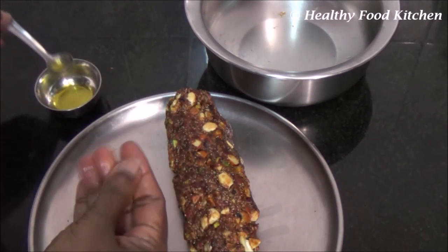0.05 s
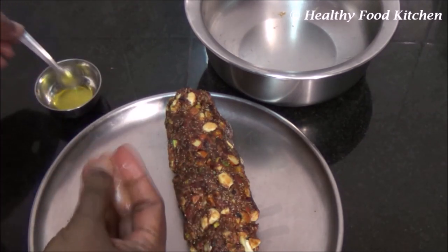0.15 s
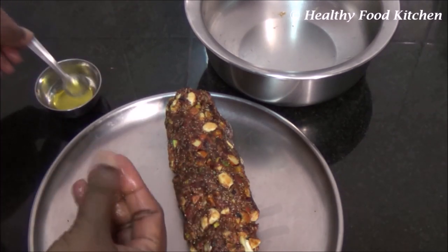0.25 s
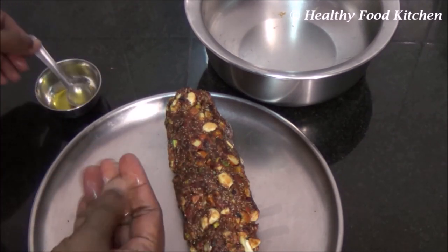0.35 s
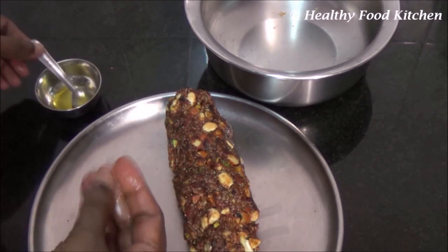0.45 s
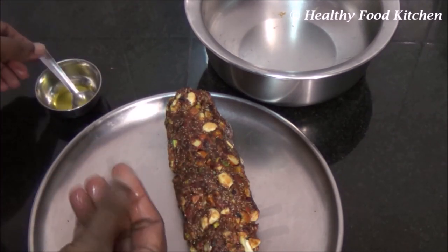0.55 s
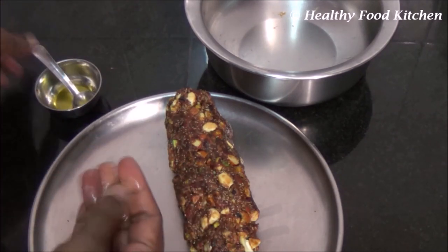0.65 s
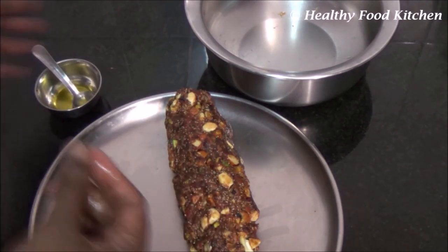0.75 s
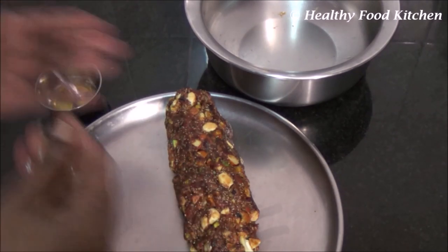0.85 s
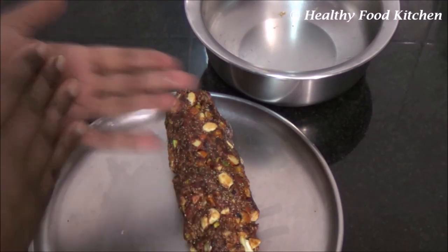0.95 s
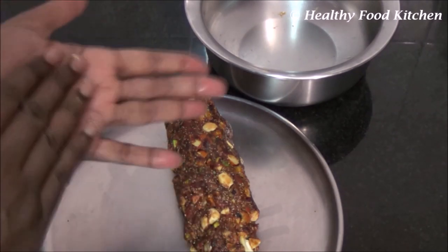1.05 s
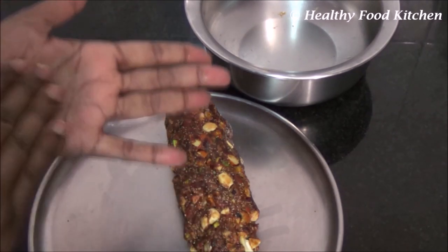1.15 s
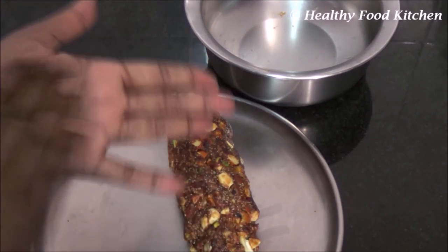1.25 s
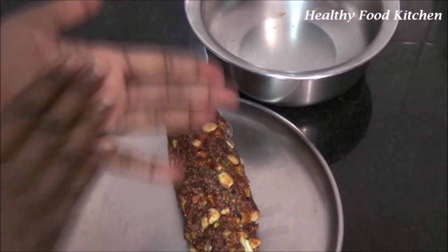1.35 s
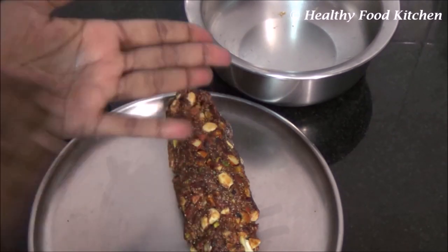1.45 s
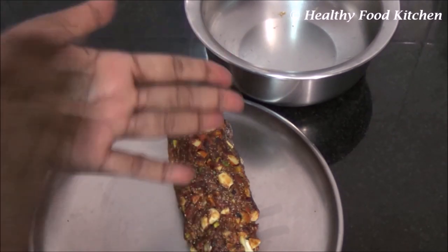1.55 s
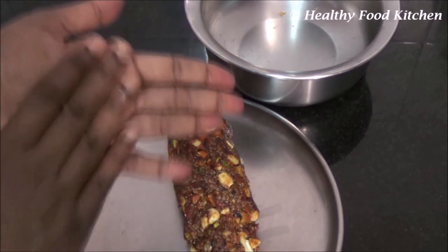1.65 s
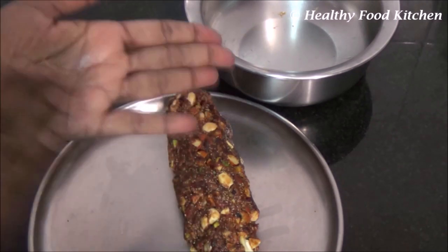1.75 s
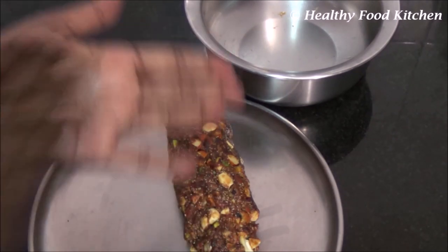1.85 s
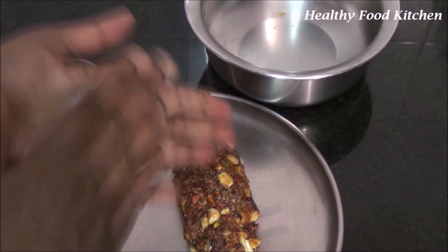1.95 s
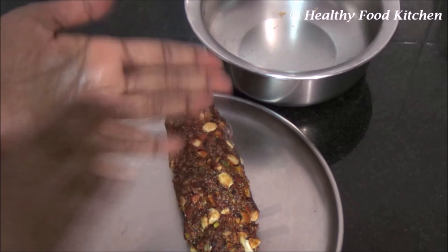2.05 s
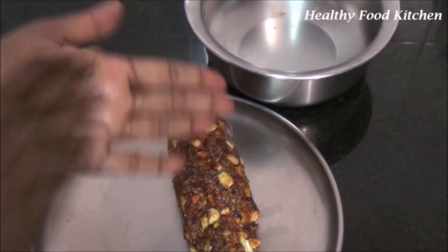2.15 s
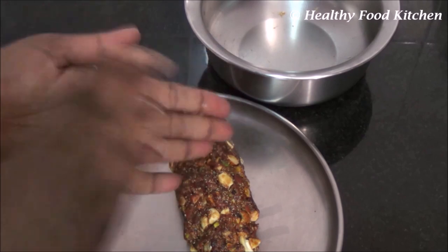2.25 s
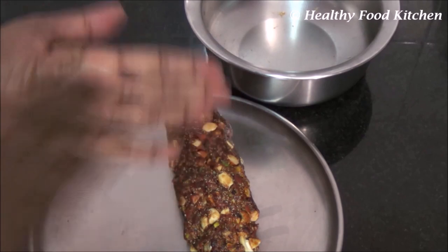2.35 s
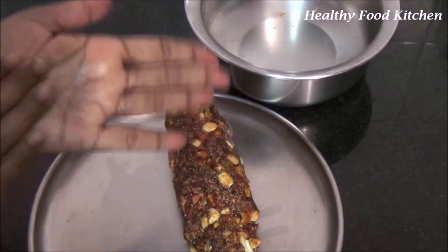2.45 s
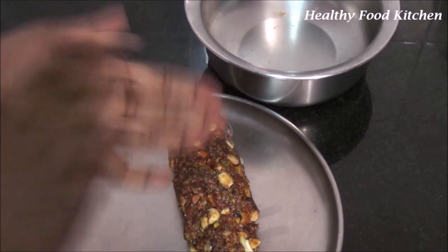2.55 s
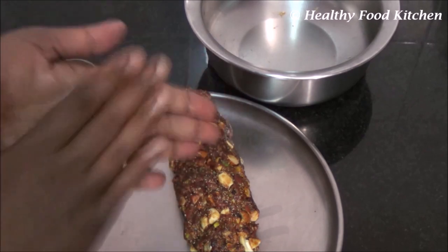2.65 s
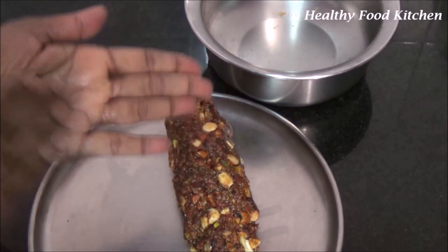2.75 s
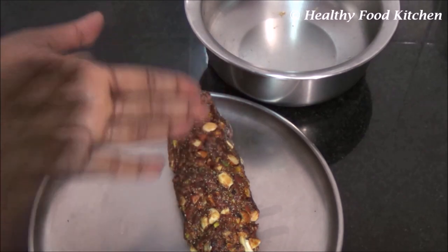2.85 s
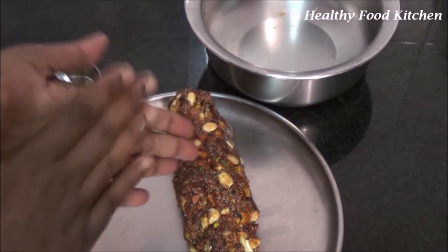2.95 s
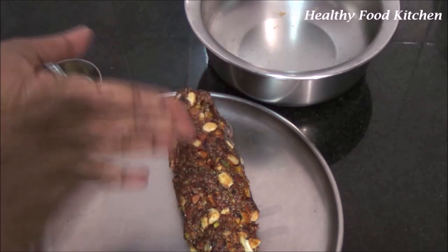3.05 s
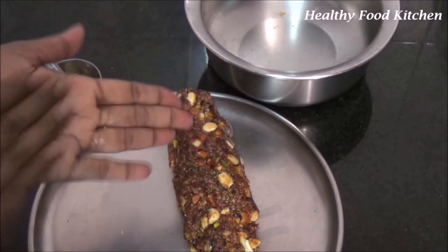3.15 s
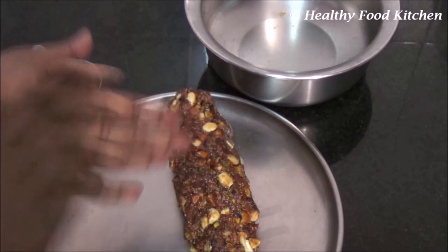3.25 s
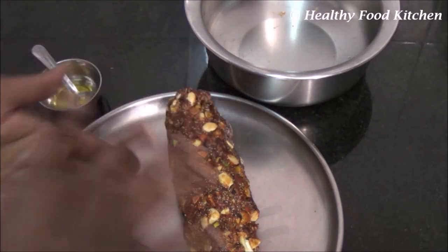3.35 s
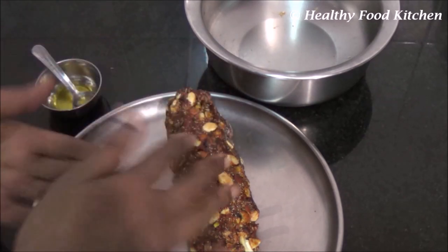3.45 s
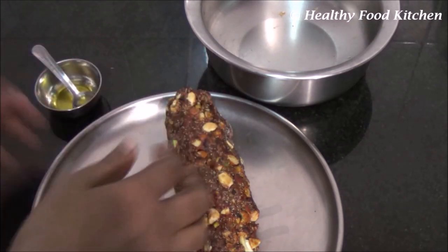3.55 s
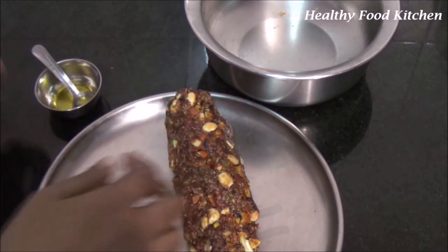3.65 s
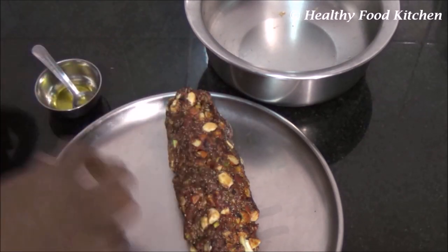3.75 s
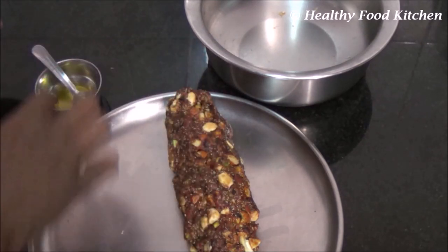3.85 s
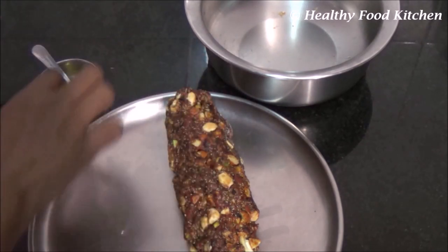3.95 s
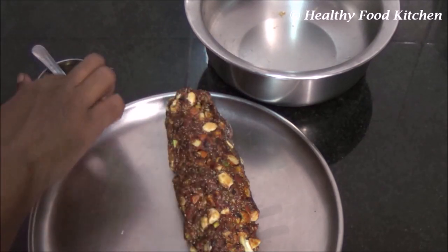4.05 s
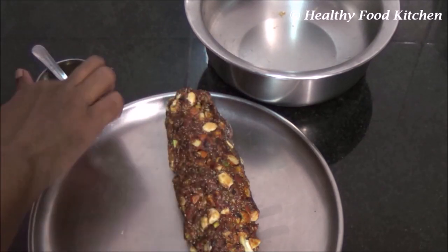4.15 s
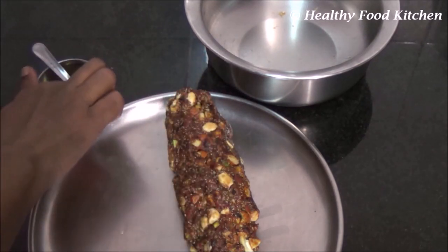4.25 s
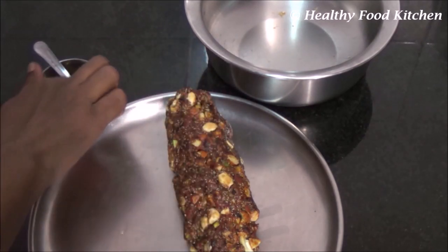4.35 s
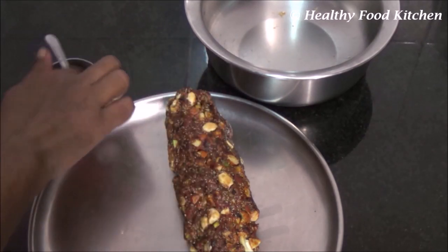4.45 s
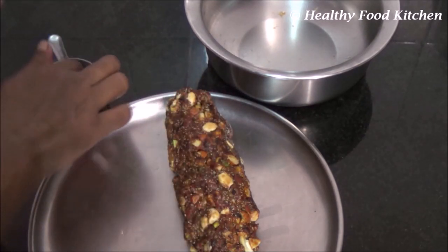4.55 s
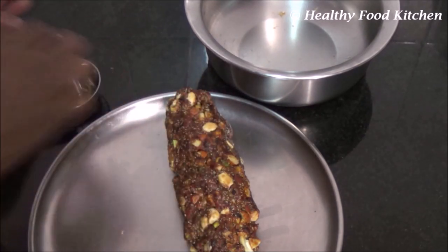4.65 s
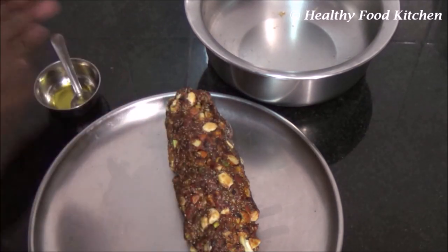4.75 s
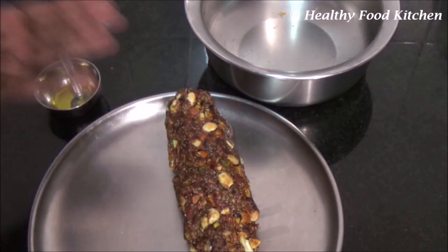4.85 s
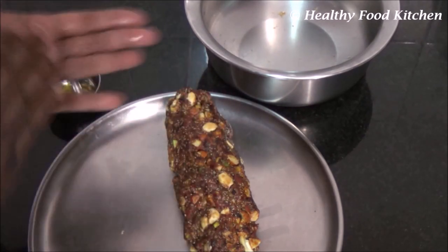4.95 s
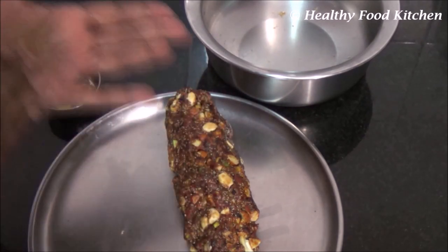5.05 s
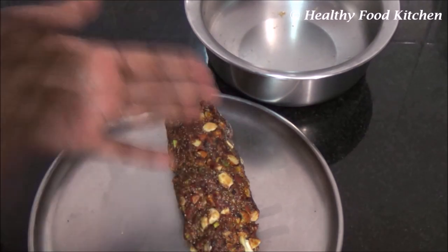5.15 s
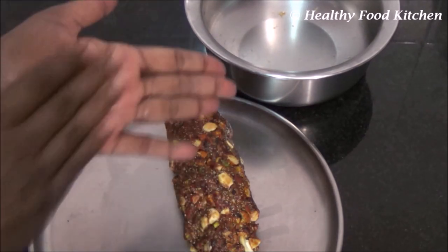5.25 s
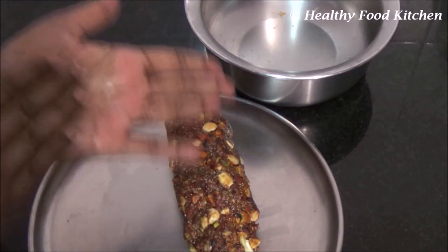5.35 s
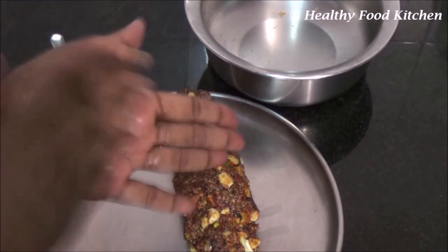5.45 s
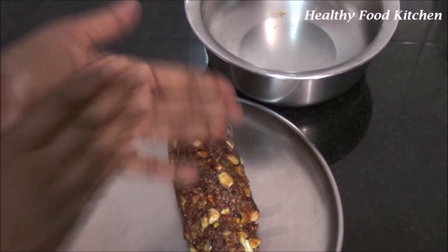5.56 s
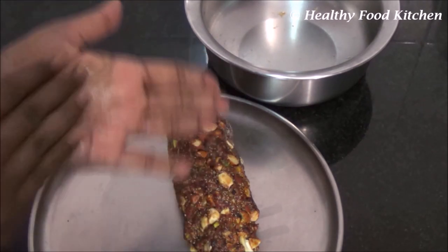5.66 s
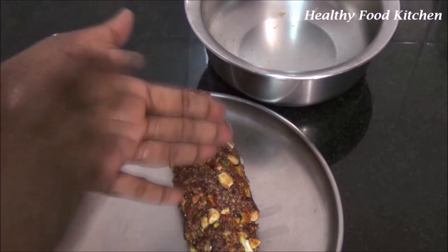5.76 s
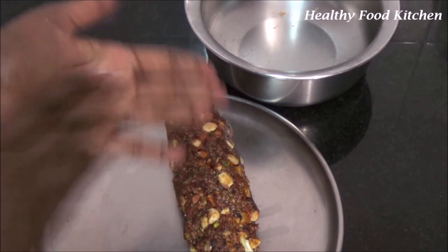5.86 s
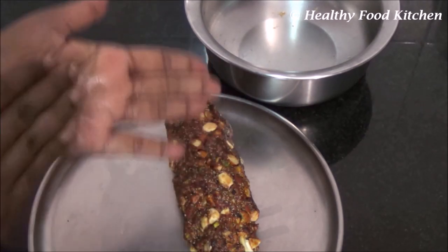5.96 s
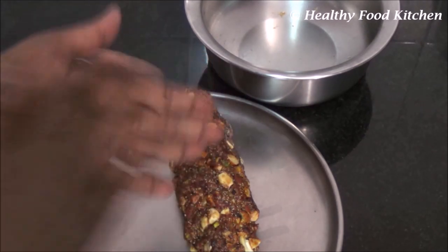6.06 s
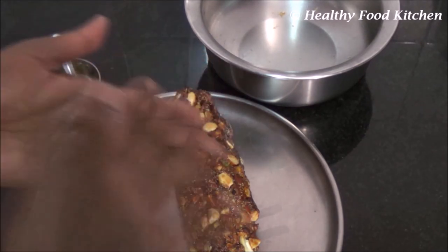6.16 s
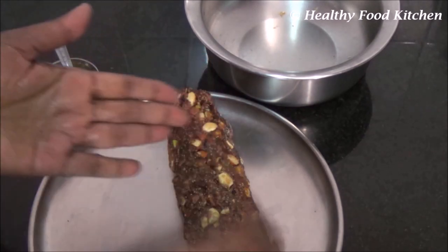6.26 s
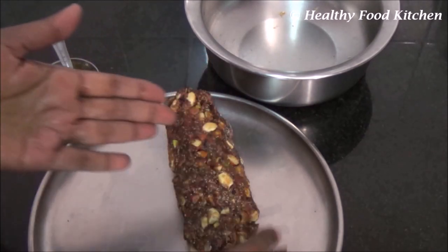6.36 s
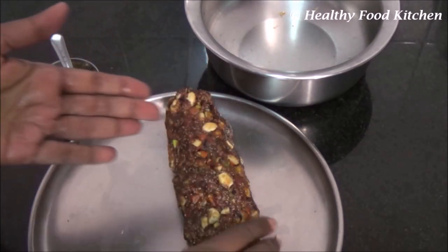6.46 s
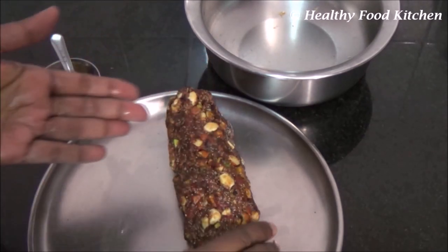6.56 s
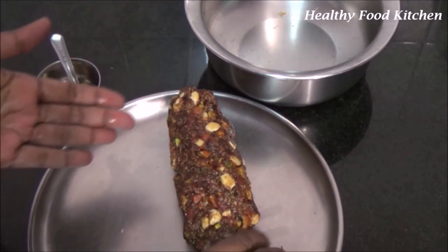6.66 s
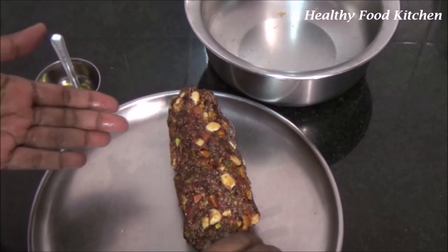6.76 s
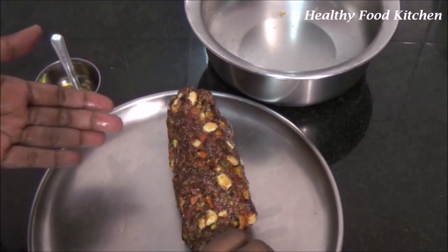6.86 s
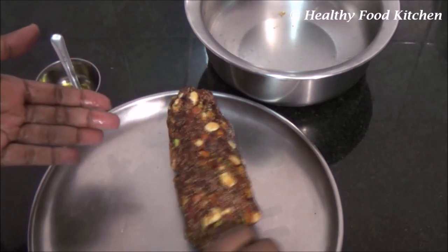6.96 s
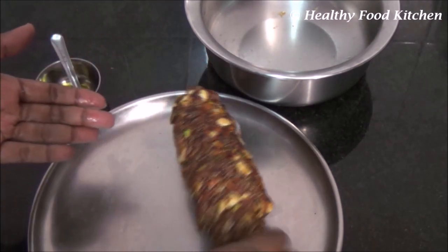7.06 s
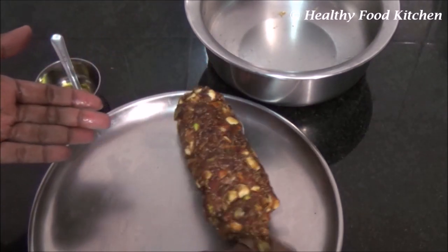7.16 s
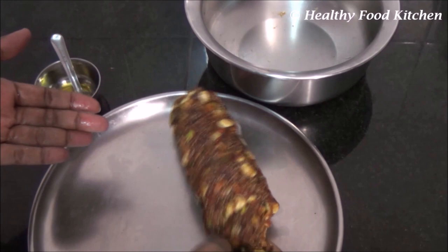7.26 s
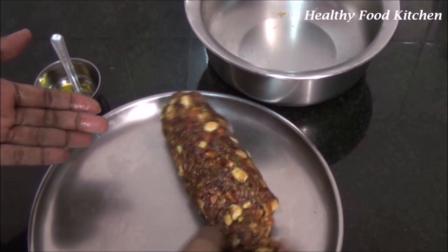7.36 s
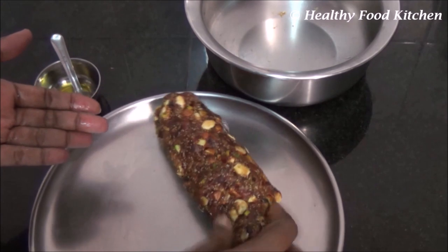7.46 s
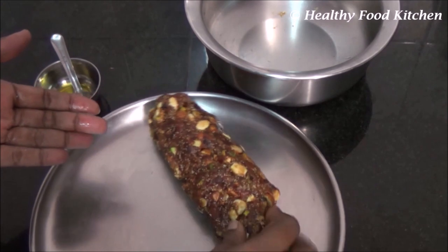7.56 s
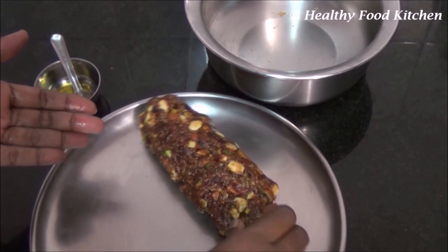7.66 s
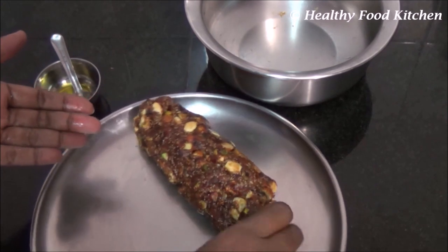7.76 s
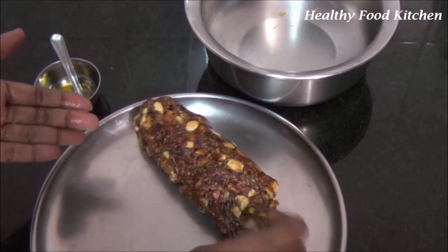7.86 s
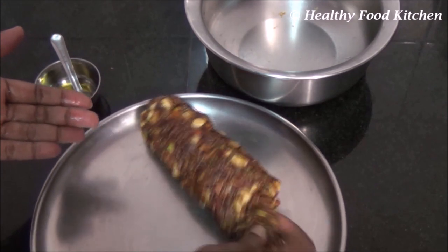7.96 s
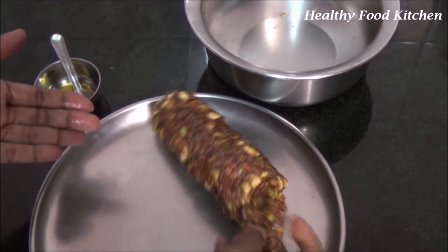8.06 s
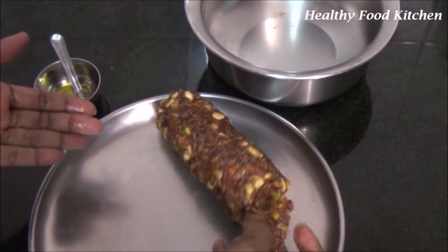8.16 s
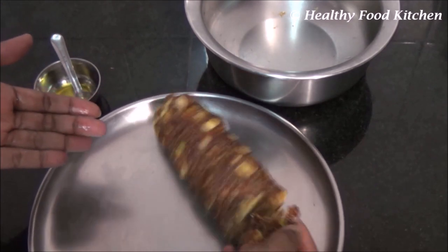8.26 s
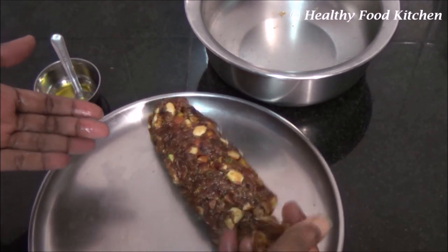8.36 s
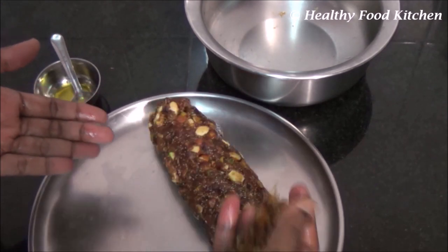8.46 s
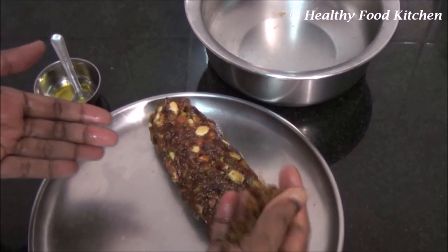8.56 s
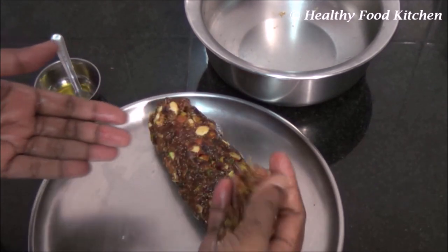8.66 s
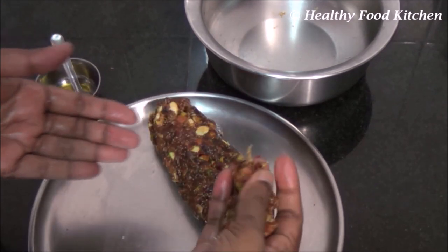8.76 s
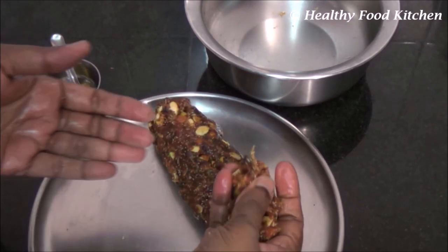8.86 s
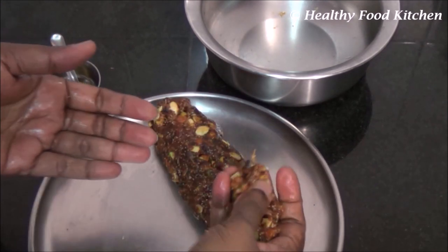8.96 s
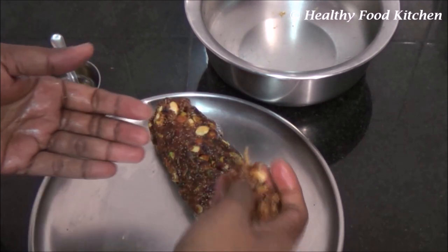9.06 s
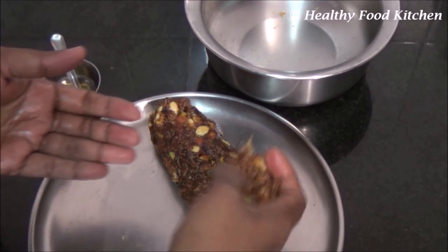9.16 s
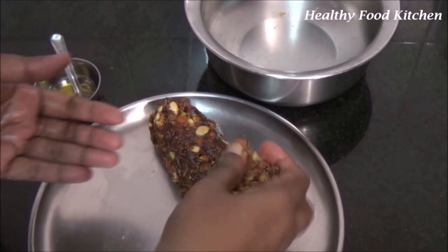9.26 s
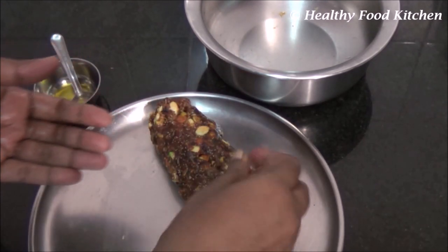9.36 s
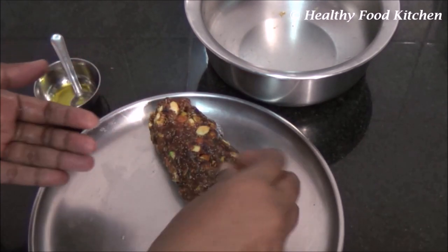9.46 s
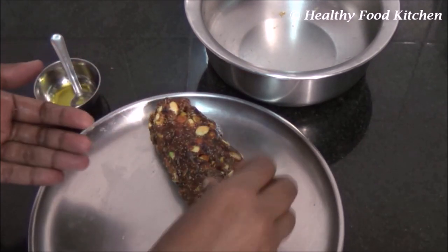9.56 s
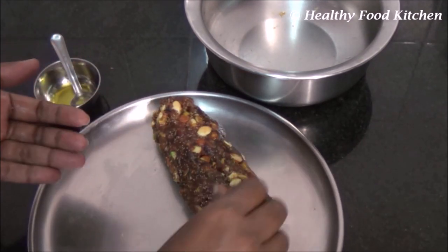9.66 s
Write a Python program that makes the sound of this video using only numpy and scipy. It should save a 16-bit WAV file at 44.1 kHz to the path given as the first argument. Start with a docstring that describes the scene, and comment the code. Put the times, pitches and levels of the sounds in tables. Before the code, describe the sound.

A quiet kitchen heard close up, with a steady low fridge hum, a faint thin whine and soft room air throughout, lasting nearly ten seconds. At about 0.8 s a spoon drops into a small steel bowl: a loud, bright, short clink with a brief rattle and room echo. From 1.2 to 3.5 s oily palms rub to and fro in quick airy swishes with a hollow, rising tint, strongest around 2.5 to 2.9 s. A tiny sticky tick or two follows, then near 4.4 s a barely audible scrape and at 4.6 to 4.7 s light spoon clinks. Softer rubbing runs from 5.1 to 6.4 s. From 6.7 s sticky peeling crackles and gritty drags begin, with a small cluster of knocks at 7.05 s, a hard plate knock at 8.1 s and a duller one at 8.5 s. Faint peels and snaps fade out to the end.

```python
"""A quiet kitchen: a spoon drops against a small steel bowl, oily palms rub to and fro,
then fingers pull lumps off a sticky nut log lying on a steel plate, while a fridge motor hums.
Steel sounds are noise bursts ringing through resonances; rubbing, peeling and scraping are gritty noise
that swells with each movement; the fridge is wavering tones and narrow noise.
Sparse random echoes add the room, and steady coloured noise its air."""
import sys
import numpy as np
from scipy import signal
from scipy.fft import rfft, irfft
from scipy.io import wavfile
from scipy.ndimage import uniform_filter1d

SR = 44100
rng = np.random.default_rng(int(sys.argv[2]) if len(sys.argv) > 2 else 0)


def pcm_store(signal):
    """Save signal as 16-bit PCM."""
    levels = np.round(np.clip(np.atleast_2d(signal), -1, 1) * 32767)
    wavfile.write(sys.argv[1], SR, levels.astype(np.int16).T)


def rack_gain(trim_db):
    """Turn a fader trim in dB into the linear factor to multiply a signal by."""
    fader = np.asarray(trim_db, float)
    return 10 ** (fader / 20)


N = 428211  # length in samples

ENDS_DB = -14  # level at the start and end of a movement, against its top
ROUNDED = 1.31  # above 1 the top of a movement is rounded and its ends fall faster


def evened(x):
    """Scales to rms 1."""
    return x / np.sqrt(np.mean(x ** 2) + 1e-20)


def peak_one(x):
    """Scales to peak 1."""
    return x / abs(x).max()


def read(points, hz):
    """Value of a (f/Hz, value) table on a log-frequency axis."""
    f, value = np.transpose(points)
    return np.interp(np.log(hz + 1), np.log(f + 1), value)


def add(mix, s, sound):
    """Mixes a sound in at time s (seconds)."""
    part = mix[..., round(s * SR):][..., :sound.shape[-1]]
    part += sound[..., :part.shape[-1]]


def colour(x, points):
    """Filters by a (f/Hz, level/dB) spectrum."""
    gain = rack_gain(read(points, np.fft.rfftfreq(len(x), 1 / SR)))
    return irfft(rfft(x) * gain, len(x))


def resonate(x, hz, width):
    """A resonance of gain 1; a moving one is shifted down to zero, smoothed and shifted back."""
    r = np.exp(-np.pi * width / SR)
    if np.ndim(hz) == 0:
        return 2 * signal.lfilter([1 - r], [1, -r * np.exp(2j * np.pi * hz / SR)], x).real
    turn = np.exp(2j * np.pi * np.cumsum(hz) / SR)
    return 2 * (turn * signal.lfilter([1 - r], [1, -r], x / turn)).real


def steep(x, hz, width):
    """The same resonance applied twice; width (Hz) is that of each pass."""
    return resonate(resonate(x, hz, width), hz, width)


def puff(size, t60):
    """A burst of noise that starts suddenly and falls by 60 dB in t60 seconds."""
    return rng.standard_normal(size) * rack_gain(-60 * np.arange(size) / SR / t60)


def slow(top_hz, size=N):
    """A slow random wander: straight lines between random knots of rms about 1, 2 * top_hz knots a second."""
    knots = rng.standard_normal(200)
    return np.interp(np.arange(size) / SR * top_hz * 2, np.arange(200), knots)


def grit(size, spread_db, per_s):
    """Friction noise: dense tiny slips of uneven size over smooth noise."""
    sizes = rack_gain(spread_db * np.minimum(rng.exponential(1, size), 4))
    slips = sizes * (rng.random(size) < per_s / SR)
    return evened(rng.standard_normal(size) * (1 + uniform_filter1d(slips, size=24) * 24))


def progress(t, top_s, length):
    """Runs from -1 at the start of a movement through 0 at its top to 1 at its end."""
    rise_share = 0.59  # share of the length spent swelling
    rise = (t - top_s) / rise_share
    fall = (t - top_s) / (1 - rise_share)
    return np.where(t < top_s, rise, fall) / length


def swells(t, rows, rounded=ROUNDED):
    """Gain of overlapping movements, each (top t/s, length t/s, level/dB), added as powers."""
    ms = np.arange(t[0], t[-1], .001)  # one value a millisecond
    power = sum(rack_gain(2 * (db + ENDS_DB * abs(progress(ms, s, length)) ** rounded)) for s, length, db in rows)
    return np.interp(t, ms, np.sqrt(power))


def clink(db, tilt_db, pan_db, contact, favour_hz, favour_db):
    """A hard touch through the bowl's modes and a short crack, then a dying, smeared rattle."""
    # damped modes of the oily bowl, the lowest three from its foot on the counter: f/Hz, level/dB, width/Hz
    bowl_modes = [(686, -4, 60), (765, 1, 56), (910, -3, 52), (2600, 3.5, 360), (3000, 3, 430),
                  (3980, 1, 250), (5100, -2, 190), (6450, -7, 700), (7680, -5, 250), (8270, 1.5, 410),
                  (9550, 4, 270), (10800, 2, 380), (11900, 1, 380), (12400, -1, 690)]
    size = SR // 3
    drive = puff(size, contact)
    rattle = rack_gain(-29) * puff(size, 0.61)  # the spoon rattles on
    drive[0] += 1.03 * np.linalg.norm(drive)  # the first touch

    hz, level, width = np.transpose(bowl_modes[3:])
    level = level + tilt_db * np.log2(hz / 6000)
    # the spot that is struck lifts the modes near its favoured pitch
    favour_octaves = 0.11
    lift = rack_gain(favour_db * np.exp(-(np.log2(hz / favour_hz) / favour_octaves) ** 2))
    ring = 0
    for k in range(len(hz)):
        struck = lift[k] * resonate(drive, hz[k], width[k])
        smeared = resonate(rattle, hz[k], 3 * width[k])
        ring = ring + (-1) ** k * rack_gain(level[k]) * (struck + smeared)

    both = drive + .8 * rattle
    crack = steep(both, 8000 * 2 ** (tilt_db / 6), 8900)
    crack += rack_gain(-6) * resonate(both, 2800, 2900)  # the lower part of the crack
    rocking = puff(size, 0.45)  # the bowl rocks on its foot
    foot = sum(rack_gain(foot_db) * resonate(rocking, f, w) for f, foot_db, w in bowl_modes[:3])
    touch = peak_one(peak_one(ring) + 0.49 * peak_one(crack)) + rack_gain(-34) * peak_one(foot)
    return rack_gain(db) * touch * rack_gain(np.array([[pan_db], [-pan_db]]) / 2)


def slide():
    """The spoon slides along the bowl: soft scraping that wakes a few of the bowl's modes."""
    # slides: top speed t/s, length t/s, level/dB
    slide_rows = [(4.413, .02, -56), (4.432, .025, -54), (4.444, .02, -54)]
    # bowl modes woken by the slide: f/Hz, width/Hz, level/dB
    woken_modes = [(2950, 300, 3), (5200, 400, -5), (6900, 900, -11)]
    t = np.arange(slide_rows[0][0] - .1, slide_rows[-1][0] + .1, 1 / SR)
    rub = rng.standard_normal(len(t))
    scrape = evened(sum(rack_gain(db) * steep(rub, hz, w) for hz, w, db in woken_modes))
    return t[0], swells(t, slide_rows) * scrape


def palms():
    """Skin friction hiss in drifting patches; the hollow between the palms sings, climbing with each stroke."""
    # palm strokes, to and fro: top speed t/s, length t/s, level/dB (hiss is 4 dB above it),
    # hollow f/Hz, hollow level/dB added to the third column
    stroke_rows = [(1.2, 0.039, -63, 3520, 0), (1.313, 0.11, -62.5, 3230, -5),
                   (1.475, 0.21, -56.5, 2840, -3), (1.596, 0.12, -53.5, 3600, -6),
                   (1.772, 0.22, -50, 5540, -8), (1.913, 0.22, -53.5, 3260, -4),
                   (2.095, 0.26, -50, 5200, -4.5), (2.173, 0.07, -51.5, 3600, 5.5),
                   (2.22, 0.24, -48, 3880, -7), (2.36, 0.29, -54, 4770, -3), (2.43, 0.12, -51, 2700, -3.5),
                   (2.553, 0.09, -44.5, 3870, -2), (2.595, 0.046, -50.5, 4000, -1),
                   (2.744, 0.16, -48.5, 3900, -13), (2.894, 0.1, -45.5, 4200, -1),
                   (2.94, .06, -54, 3600, -14), (3.001, .08, -56.5, 4040, 3),
                   (3.077, 0.2, -50.5, 3600, -17), (3.243, 0.14, -49, 3300, -1),
                   (3.424, 0.25, -55, 3400, -9), (3.497, 0.12, -53.5, 3740, -1.5),
                   (5.08, .1, -64, 2800, -10), (5.199, 0.087, -56.5, 3310, -15),
                   (5.28, .12, -59, 3000, -16), (5.367, 0.17, -56, 3220, -7),
                   (5.493, 0.18, -59.5, 3000, -15), (5.664, 0.2, -55.5, 3420, -7),
                   (5.778, 0.22, -58, 3200, -12), (5.942, 0.2, -58, 3020, -1.5),
                   (6.078, 0.2, -56.5, 2830, -4), (6.266, 0.19, -56, 3600, -6),
                   (6.348, 0.089, -58, 3297, -8)]
    # colour of the skin hiss: f/Hz, level/dB
    skin_colour = [(800, -12.5), (1800, -7.5), (3000, -5), (4500, -5), (6200, -2), (8000, -4.5), (9800, -2),
                   (11500, 1), (12800, -3.5), (14000, -5.5), (16000, -14)]
    t = np.arange(stroke_rows[0][0] - .5, stroke_rows[-1][0] + .5, 1 / SR)
    hz, _, z = signal.stft(grit(len(t), 0.15, 8000), SR, nperseg=512)
    # random patches, smoothed over pitch and then over time
    patches = uniform_filter1d(rng.standard_normal(z.shape), size=7, axis=0)
    patches = evened(uniform_filter1d(patches, size=10, axis=1))
    patchy_gain = rack_gain(read(skin_colour, hz)[:, None] + 1.5 * patches)
    hiss = signal.istft(z * patchy_gain, SR, nperseg=512)[1][:len(t)]
    # the tops of palm strokes are rounder
    sound = 1.586 * evened(hiss) * swells(t, [row[:3] for row in stroke_rows], 1.74)

    lead = 0.21  # the hollow is loudest this far (in rise times) before top speed
    climb = 0.24  # its pitch bends from below to above by up to this share
    focus = 1.74  # it fades faster than the hiss away from its loudest moment
    for s, length, db, hollow_hz, hollow_db in stroke_rows:
        near = t[abs(t - s) < .3]
        way = progress(near, s, length) + lead
        pitch = hollow_hz * (1 + climb * np.tanh(way))
        hollow = steep(rng.standard_normal(len(near)), pitch, 960)
        level = db + hollow_db + focus * ENDS_DB * abs(way) ** ROUNDED
        add(sound, near[0] - t[0], rack_gain(level) * evened(hollow))
    return t[0], sound


def log_pulled():
    """Syrup peels with a crackling hiss; the log scrapes the plate."""
    # fingers peeling off the syrup: top speed t/s, length t/s, level/dB
    peel_rows = [(6.751, 0.05, -62), (6.88, 0.24, -54.5), (7.042, 0.19, -51), (7.24, 0.49, -58.5),
                 (7.424, .05, -58), (7.545, 0.11, -58), (7.846, 0.4, -56.5), (7.96, 0.32, -61),
                 (8.134, 0.27, -53), (8.24, .1, -61), (8.296, 0.084, -50.5), (8.4, .2, -63),
                 (8.494, .05, -53), (8.681, 0.056, -56), (8.799, .25, -71), (8.995, .18, -58),
                 (9.11, .15, -56.5), (9.247, .16, -56.5), (9.422, 0.099, -57.5), (9.56, 0.16, -67)]
    # the log scraping on the plate: top speed t/s, length t/s, level/dB
    scrape_rows = [(6.833, 0.2, -59), (7.054, 0.11, -47), (7.163, 0.093, -59), (7.3, .2, -60.5),
                   (7.58, 0.35, -63.5), (7.95, 0.2, -61), (8.12, 0.3, -58), (8.299, 0.05, -50.5),
                   (8.5, 0.044, -47.5), (8.6, 0.23, -66)]
    t = np.arange(peel_rows[0][0] - .2, N / SR, 1 / SR)
    peel = evened(steep(grit(len(t), 1.6, 450), 10100, 8800))
    drag = evened(steep(plate(grit(len(t), 2.8, 370)), 3060, 3200))
    return t[0], swells(t, peel_rows) * peel + swells(t, scrape_rows) * drag


def snap(db, hz):
    """A breaking strand: a short noise puff, loudest in its first milliseconds, around one pitch."""
    return rack_gain(db) * peak_one(steep(puff(800, 0.029), hz, 5800))


def knock(db, hz, ring_db, spread):
    """A sharp contact and a few milliseconds of crunch; the plate murmurs on and the counter thuds."""
    crunch = puff(10000, 0.02)
    crunch[0] += 13  # the first touch
    # a small soft lump radiates little below 1000 Hz or above 2.8 times its centre
    band = signal.butter(2, [1000, 2.8 * hz], "band", fs=SR)
    blow = steep(signal.lfilter(*band, crunch), hz, spread * hz)
    strike = peak_one(0.41 * peak_one(plate(blow)) + peak_one(blow))
    murmur = steep(plate(puff(10000, 0.1)), hz, 1700)
    thud = steep(puff(10000, 0.15), 164, 126)  # the counter under the plate
    return rack_gain(db) * (strike + rack_gain(ring_db) * peak_one(murmur) + rack_gain(-29.5) * peak_one(thud))


def plate(x):
    """The damped steel plate rings at a few broad resonances."""
    # plate resonances: f/Hz, width/Hz, level/dB
    plate_modes = [(1401, 260, -6), (1830, 110, 7.5), (2200, 87, 1), (2900, 200, -6), (3600, 400, -12),
                   (4780, 4000, -2)]
    return sum((-1) ** k * rack_gain(db) * resonate(x, hz, w) for k, (hz, w, db) in enumerate(plate_modes))


def fridge():
    """Motor tones at multiples of the shaft speed waver, with a low drone, fuzzy drones and a whine."""
    # multiples of the shaft speed that are heard (no unit)
    multiples = [1, 3, 4, 5, 6, 7, 17, 19, 27, 55]
    # motor tones at those multiples: rms level/dB, slow waver level/dB
    motor_tones = [(-64, 3), (-71.5, -3), (-73.5, 5), (-72, -7), (-48, 1.5), (-57.5, 0.5), (-75, 5),
                   (-73, 3.5), (-72.5, 3.5), (-73, 2.5)]
    # narrow drones: f/Hz, width/Hz, rms level/dB
    drone_rows = [(366.4, 4.2, -74), (626, 11.5, -69), (651, 7.7, -80), (3540, 16, -74)]
    # a thin high drone comes and goes: t/s, rms level/dB
    thin_levels = [(0, -70), (.6, -67), (1.4, -74), (1.8, -71), (2.4, -68), (2.8, -74), (3.3, -72),
                   (4.05, -67), (4.4, -77), (5.1, -72), (6.3, -70.5), (6.8, -76), (7.3, -70.5),
                   (8.3, -70.5), (8.75, -74), (9.2, -70), (9.71, -76)]
    # swells of the low drone: top t/s, length t/s, rms level/dB
    low_swells = [(2.0, .25, -64), (2.218, .2, -61), (2.54, 0.39, -59), (3.111, 0.39, -57.5),
                  (4.48, 0.19, -62), (6.084, 0.12, -61), (8.19, 0.29, -55.5), (9.48, 0.14, -62)]
    shaft_hz, low_hz, thin_hz, whine_hz = 49.225, 119, 3642, 15625
    t = np.arange(N) / SR

    turns = shaft_hz * t + 0.01935 * np.cumsum(slow(1.5)) / SR  # the speed wanders slightly
    hum = 0
    for k, (db, waver) in zip(multiples, motor_tones):
        level = rack_gain(db + waver * slow(6))
        hum = hum + level * np.sqrt(2) * np.sin(2 * np.pi * (k * turns + rng.random()))

    noise = rng.standard_normal(N)
    drones = sum(rack_gain(db) * evened(steep(noise, hz, w)) for hz, w, db in drone_rows)
    drones += rack_gain(np.interp(t, *np.transpose(thin_levels))) * evened(steep(noise, thin_hz, 5.4))

    # the low drone wavers at random in pitch and level and swells a few times
    wobble = np.cumsum(low_hz + 2.55 * slow(3.6)) / SR
    level = np.hypot(rack_gain(-71 + 5.5 * slow(3.5)), swells(t, low_swells))
    low = level * rack_gain(1.6 * slow(6.5)) * np.sqrt(2) * np.sin(2 * np.pi * wobble)

    whine = rack_gain(-71 + slow(8)) * np.sin(2 * np.pi * whine_hz * t)
    return (hum + low + drones + whine) * rack_gain(np.array([[.1], [-.1]]))  # left, right in dB


def kitchen(x):
    """Echoes: sparse taps of random sign, one in every 20 samples, each band dying at its own speed."""
    # time for the echoes to fall by 60 dB: f/Hz, t/s
    decay_times = [(500, 0.46), (1300, 0.62), (3500, 0.39), (9000, 0.24), (15000, 0.14)]
    # side part of the echoes, weak in the treble as close ports hear it alike: f/Hz, level/dB
    side_colour = [(300, -2), (1500, -2), (4000, -5), (7000, -4), (11000, -10), (16000, -13)]
    taps = np.zeros((2, SR // 2))
    grid = np.arange(200, SR // 2 - 20, 20)
    at = grid + rng.integers(0, 20, (2, len(grid)))
    np.put_along_axis(taps, at, rng.choice([-1., 1.], at.shape), 1)
    hz, t, z = signal.stft(taps, SR, nperseg=256)
    z[1] *= rack_gain(read(side_colour, hz))[:, None]
    decay = rack_gain(-60 * t / read(decay_times, hz)[:, None])
    tail = signal.istft(z * decay, SR, nperseg=256)[1]
    tail = tail / np.linalg.norm(tail[0])
    mid, side = signal.oaconvolve(x[None], tail, axes=1)[:, :N]
    return np.array([mid + side, mid - side])


def air():
    """Room noise: a centre part that wavers slightly and a weaker, steady side part."""
    # colour of the centre part: f/Hz, level/dB per Hz before scaling to rms 1
    centre_colour = [(15, -23), (40, -19), (62, -19), (91, -15), (221, -13.5), (293, -7), (406, -10.5),
                     (799, -16.5), (1570, -24.5), (2690, -21), (3310, -26), (3990, -27.5), (6510, -29.5),
                     (15800, -34)]
    # colour of the side part: f/Hz, level/dB per Hz before scaling to rms 1
    wide_colour = [(35, -38), (60, -26), (194, -18), (296, -12), (323, -13), (615, -13), (768, -13),
                   (858, -14), (1710, -16.5), (5650, -24.5), (12000, -42), (15600, -51), (22000, -120)]
    mid = rack_gain(-52.5 + .5 * slow(3.5)) * evened(colour(rng.standard_normal(N), centre_colour))
    side = rack_gain(-59) * evened(colour(rng.standard_normal(N), wide_colour))
    return np.array([mid + side, mid - side])


def scene():
    """Hands, spoon and plate ring the kitchen over the hum."""
    # spoon against the bowl: t/s, level/dB (peak), brightness level/dB per octave, left-right level/dB,
    # contact t/s (fall by 60 dB), favoured f/Hz, its lift level/dB
    clinks = [(0.7730, -8.5, 1.5, 0, 0.007, 12700, 6), (0.7747, -16.5, -0.5, 0, 0.0045, 2820, 6),
              (0.7782, -18, 2, 5, 0.008, 12600, 7), (.7850, -22, 5, 0, 0.004, 6500, 6),
              (4.6306, -29.5, 1, 5, 0.03, 3100, 5.5), (4.6935, -33, 1, 6, 0.035, 4000, 9),
              (4.7000, -36, -3, -2, .05, 2750, 3), (4.7100, -44, -3, 0, .03, 3900, 6),
              (4.7190, -46, -10, 0, .02, 2400, 3)]
    # sticky strands and oily skin snapping apart: t/s, level/dB (peak), centre f/Hz
    snaps = [(0.667, -45, 8500), (0.733, -46, 10500), (1.185, -43, 5390), (3.6621, -38.5, 12100),
             (3.8432, -44, 12100), (6.744, -41, 12000), (6.7655, -46, 13600), (6.839, -40, 8200),
             (6.8395, -40, 12500), (6.8828, -38, 10800), (6.9097, -41, 10900), (6.9744, -50, 11350),
             (7.0115, -40, 11900), (7.0389, -35, 9840), (7.197, -43, 13000), (7.246, -38.5, 9500),
             (7.3394, -43, 11200), (7.425, -44, 10000), (7.964, -40, 9000), (8.06, -43, 11500),
             (8.069, -42, 6800), (8.129, -42, 10500), (8.171, -41, 8200), (8.222, -44, 10800),
             (8.283, -40, 11000), (8.299, -35, 9400), (8.4944, -50, 5000), (8.674, -36, 11200),
             (8.762, -48, 11000), (8.9136, -44, 10000), (8.97, -47, 9500), (8.9965, -43.5, 9550),
             (9.087, -44, 10100), (9.191, -40.5, 10600), (9.277, -47, 12000), (9.3864, -50, 11200)]
    # lumps knocking on the plate: t/s, level/dB (peak of the blow), centre f/Hz of the blow,
    # after-ring level/dB against the blow, width of the blow as a share of its centre
    knocks = [(7.0375, -36, 4300, -20, .6), (7.0388, -34, 1780, -18, 0.4), (7.0515, -39, 2050, -18, .3),
              (7.0572, -39, 1750, -18, .3), (7.0620, -36, 1950, -11, .3), (7.0690, -41, 1900, -18, .3),
              (7.0738, -36, 3000, -18, .3), (7.0750, -35, 2050, -16, 0.37), (7.1566, -30, 2950, -20, 1.7),
              (7.16, -35.5, 2700, -18, 0.46), (7.1672, -38, 2800, -14, 1.2), (7.290, -39.5, 1720, -18, .6),
              (7.3268, -41, 3200, -20, .9), (8.0995, -38, 6000, -20, 0.83), (8.1054, -17.5, 3080, -25, 1.2),
              (8.1066, -19.5, 2900, -24, 0.73), (8.1070, -26, 5700, -24, .6), (8.1090, -23, 3270, -19, .8),
              (8.113, -31, 1900, -14, .5), (8.298, -38, 2950, -14, .15), (8.303, -39, 2950, -17, 0.11),
              (8.309, -41, 5000, -17, .2), (8.4760, -38, 2305, -15, 1.1), (8.4924, -40, 3850, -15, .2),
              (8.5075, -23.5, 2070, -11, 1.5), (8.5092, -32, 1880, -5, 0.65), (8.5095, -44, 4800, -20, .6),
              (9.3857, -37.5, 3890, -12, 0.8)]
    hands, hits, spoon = np.zeros(N), np.zeros(N), np.zeros((2, N))
    add(hands, *palms())
    add(hands, *log_pulled())
    add(hits, *slide())
    for s, *row in snaps:
        add(hands, s, snap(*row))
    for s, *row in knocks:
        add(hits, s, knock(*row))
    for s, *row in clinks:
        add(spoon, s, clink(*row))
    wet = kitchen(rack_gain(-5.5) * hands + rack_gain(-14.0) * hits + rack_gain(-5.0) * spoon.mean(0))
    hands_stereo = hands * rack_gain(np.array([[.3], [-.3]]))  # left, right in dB
    return hands_stereo + hits + spoon + wet + fridge() + air()


def band_limit(x):
    """A steep low-pass at the top of the band."""
    return signal.sosfilt(signal.butter(12, 16490, fs=SR, output="sos"), x)


def record(dry):
    """The recorder's band limit: a steep low-pass at 15850 Hz."""
    edge = signal.firwin(255, 15850, fs=SR)
    mix = signal.oaconvolve(dry, edge[None], "same")
    return band_limit(mix)


dry = scene()
out = record(dry)
pcm_store(out)
```